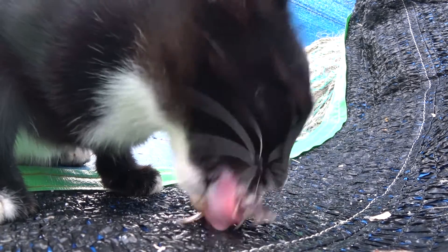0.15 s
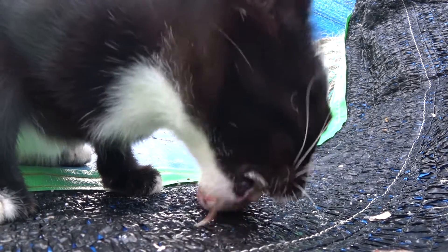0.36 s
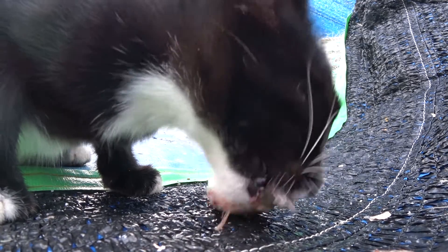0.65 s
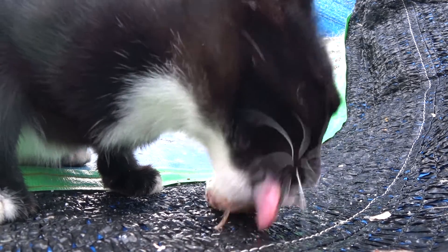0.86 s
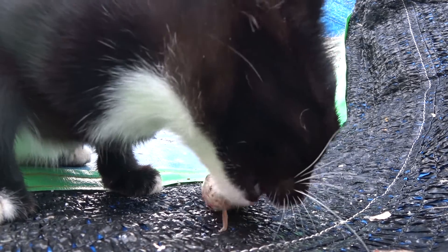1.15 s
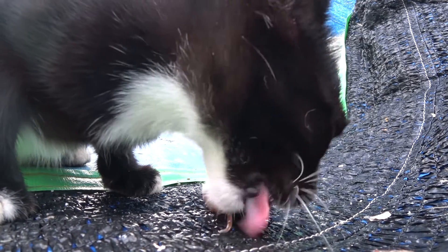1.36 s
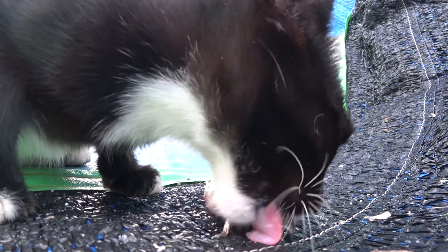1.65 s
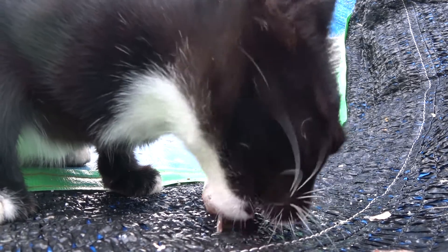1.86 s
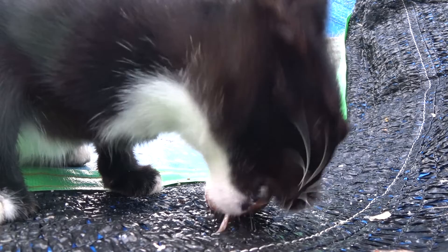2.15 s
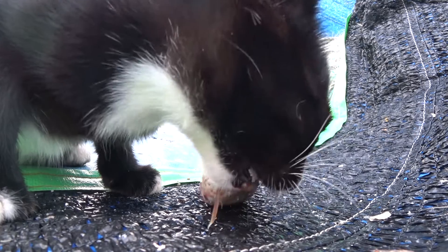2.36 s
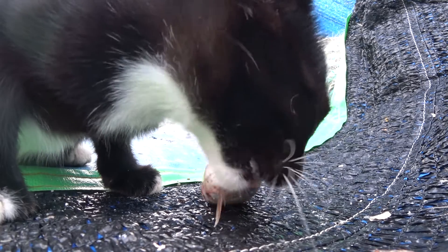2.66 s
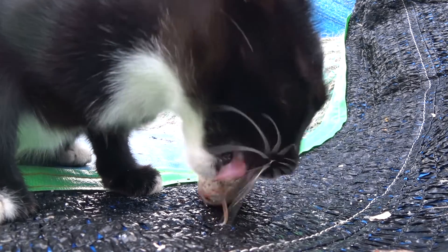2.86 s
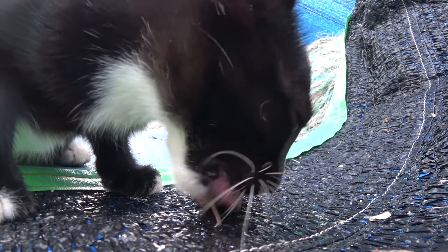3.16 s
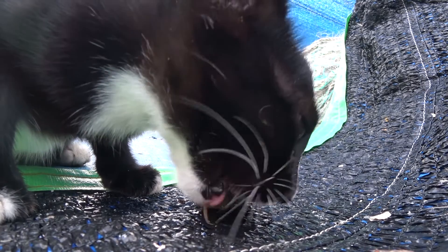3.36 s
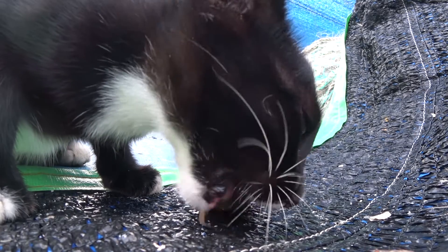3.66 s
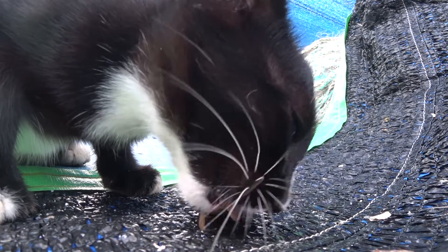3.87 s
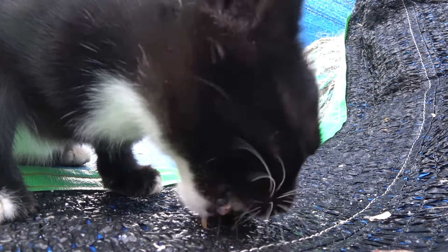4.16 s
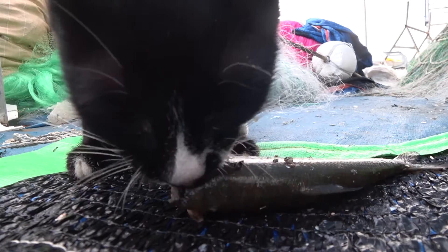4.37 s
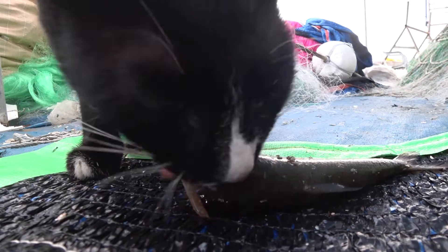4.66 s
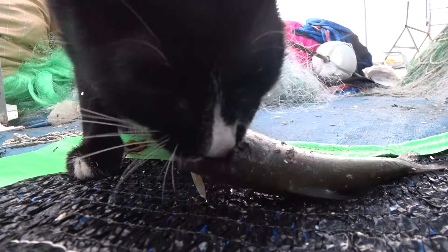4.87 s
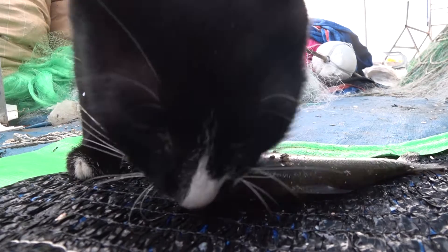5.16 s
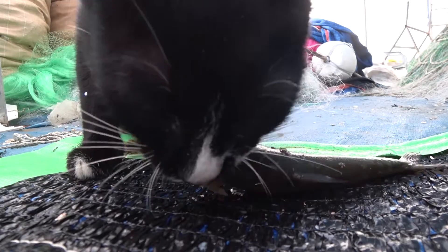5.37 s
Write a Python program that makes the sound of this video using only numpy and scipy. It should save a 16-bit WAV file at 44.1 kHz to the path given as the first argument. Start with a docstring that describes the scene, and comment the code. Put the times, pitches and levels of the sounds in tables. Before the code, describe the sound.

Close, wet animal eating: irregular lapping rasps, sticky crackles and hard little crunches of teeth on bone over a soft distant outdoor rush.

```python
"""Outdoors on a heap of netting, a kitten gnaws and licks a raw fish a hand's width from a camera's two ports.
Bites are sudden releases that ring mouth and bone; clucks and smacks are suction and wet films letting go.
The rasping tongue is noise and small slips through a gliding mouth resonance; saliva is crackle over fizz.
A soft distant rush of coloured noise lies behind; the limiter ducks everything after loud peaks."""
import sys
import numpy as np
from scipy import signal
from scipy.fft import rfft, irfft, next_fast_len
from scipy.io import wavfile
from scipy.ndimage import uniform_filter1d, minimum_filter1d, map_coordinates

SR = 44100
rng = np.random.default_rng(int(sys.argv[2]) if len(sys.argv) > 2 else 0)


def unload_audio(sound):
    """Save the sound as a 16-bit wav file, at the path given as the first command line argument."""
    columns = np.transpose(np.atleast_2d(sound))
    # keep every value between -1 and 1, then stretch to whole-number steps
    steps = np.round(np.clip(columns, -1, 1) * 32767)
    wavfile.write(sys.argv[1], SR, steps.astype(np.int16))


N = 242975

HIT = np.arange(2048) / SR  # time axis of one short sound, s
ONSET = 0.002  # its release comes this late in it, s
STEPS = np.arange(0, N, 64) / SR  # coarse time axis for the strokes, s

# strokes of the tongue over the fish, levels relative: t/s of the hardest pull, length/s, rasp level/dB,
# wetness level/dB, mouth f/Hz, glide of the mouth/(octaves per s), mouth Q
STROKES = [(0.414, 0.078, -39.5, -40.5, 1670, 0, 2.2), (.59, .035, -46, -57.5, 1640, 4, 3.8),
           (0.67, 0.051, -45, -50, 1410, -3.5, 1.6), (0.799, 0.084, -45, -49, 1890, -4, 1.9),
           (1.032, .05, -42, -61.5, 2330, 4.5, 3.4), (1.106, 0.09, -43, -43, 1390, -1, 0.47),
           (1.473, .045, -40, -56, 1290, 7.5, 2.2), (1.584, 0.059, -40, -46.5, 1915, -3, 1.8),
           (1.747, 0.033, -46.5, -68.5, 1740, -0.5, 1.56), (1.898, 0.071, -46.5, -52, 2010, -5.5, 2.7),
           (2.037, 0.038, -43, -60, 1650, -1.5, 1.2), (2.145, .06, -47, -58, 1730, 0, 1.5),
           (2.284, .08, -50.5, -51.5, 1880, -3, 2.6), (2.335, .04, -41.5, -51.5, 1370, -6.5, 2.1),
           (2.776, 0.036, -45, -66, 3330, 5.5, 1.2), (3.063, 0.16, -48.5, -53, 1667, -1.5, 2.6),
           (3.466, 0.083, -45.5, -50.5, 1820, 0, 4.2), (3.704, 0.073, -45, -54.5, 2400, -0.5, 1.05),
           (3.976, .075, -40.5, -53.5, 1894, -2.5, 1.8), (4.135, 0.023, -44, -55, 2232, -5.5, 1.7),
           (4.27, 0.019, -44, -53.5, 2000, 0.5, 1.3), (4.351, 0.084, -45.5, -52, 1574, 0, 1.7),
           (4.858, .075, -39, -53, 1780, 0.5, 0.74), (4.966, 0.074, -49, -50, 1797, -1.5, 1.5),
           (5.224, 0.031, -52.5, -53, 2273, 1, 1.07), (5.385, 0.047, -45.5, -46, 2000, -2.5, 0.32),
           (5.491, 0.03, -33, -47.5, 2000, 1, 0.64)]
WET_LEAD_S = 0.044  # the tongue lands wetly this long before it pulls hardest
# drop in dB at half a stroke's length before and after the peak; exponent of the fall (larger is rounder)
SWELL_DB, FADE_DB, ROUNDNESS = 6.5, 8, 1.27
REST_RASP_DB, REST_WET_DB = -66.5, -65.5  # the mouth between strokes, on the same scales as its strokes


def amp(db):
    """Decibels to gain."""
    return 10 ** (np.asarray(db) / 20)


def unit(x):
    """Scale to rms 1."""
    return x / np.sqrt(np.mean(x ** 2) + 1e-20)


def along(points, hz):
    """(Hz, value) points read on a log axis."""
    f, v = np.transpose(points)
    return np.interp(np.log(hz + 1), np.log(f), v)


def curves(rows):
    """One value per sample for each column after the time."""
    s, *cols = np.transpose(rows)
    return [np.interp(np.arange(N) / SR, s, c) for c in cols]


def wobble(rate):
    """A smooth random curve with rate knots a second."""
    knots = rng.standard_normal(int(N * rate / SR) + 4)
    return map_coordinates(knots, [np.arange(N) * rate / SR])


def filtered(x, response):
    """x times a response of frequency."""
    n = x.shape[-1]
    m = next_fast_len(n + 2048)  # room for the tail
    return irfft(rfft(x, m) * response(np.fft.rfftfreq(m, 1 / SR)), m)[..., :n]


def coloured(x, spectrum):
    """x through the causal minimum-phase filter that has this spectrum."""
    cepstrum = irfft(np.log(amp(along(spectrum, np.fft.rfftfreq(len(HIT), 1 / SR)))))
    fold = 1 + np.sign(len(HIT) / 2 - np.arange(len(HIT)))
    fold[0] = 1
    response = irfft(np.exp(rfft(cepstrum * fold)))
    return signal.fftconvolve(np.atleast_2d(x), response[None], axes=1)[:, :x.shape[-1]]


def resonance(f, hz, q):
    """Response of one damped mode."""
    return 1j * f * hz / q / (hz * hz - f * f + 1j * f * hz / q)


def highpass(f, hz):
    """A small source radiates little below hz."""
    return -f * f / (hz * hz - f * f + 1j * f * hz)


def noise(n, width):
    """Stereo noise: one shared part and one of each side's own."""
    shared = rng.standard_normal(n)
    return unit(shared + width * rng.standard_normal((2, n)))


def patchy(x, depth_db):
    """Patches of the spectrum swell and fade for a few hundredths of a second."""
    z = signal.stft(x, nperseg=256)[2]
    field = uniform_filter1d(rng.standard_normal(z.shape[1:]), size=9, axis=0)  # across frequency
    field = uniform_filter1d(field, size=7, axis=1)  # across time
    return unit(signal.istft(z * amp(depth_db * unit(field)), nperseg=256)[1][:, :N])


def crackle(rate, spread_db):
    """Tiny pops of unequal size at random moments, rate a second, each a little to one side."""
    at = np.flatnonzero(rng.random(N) < rate / SR)
    size = amp(spread_db * np.minimum(rng.standard_exponential(len(at)), 3.5))
    size = size * rng.choice([-1, 1], len(at))
    pops = np.zeros((2, N))
    pops[:, at] = size * amp(2 * rng.standard_normal((2, len(at))))
    return unit(pops)


def burst(rise, life, rough):
    """Strain crackles up over rise s, lets go at once and leaves chatter that dies over life s."""
    t = HIT - ONSET
    swell = np.exp(np.minimum(t / rise, -t / life))
    release = unit(np.arange(len(HIT)) == round(ONSET * SR))
    return release + rough * unit(noise(len(HIT), width=0.19) * swell)


def add(track, s, db, sound):
    """Put a short sound into the stereo track; db is its level as if packed into four milliseconds."""
    span = 0.004
    part = track[:, max(round((s - ONSET) * SR), 0):][:, :len(HIT)]
    levelled = amp(db) * unit(sound) * np.sqrt(span * SR / len(HIT))
    part += levelled[:, :part.shape[1]]


def outdoors():
    """A soft distant rush, narrow in the bass and wide in the middle."""
    # its level over time, with a quick drop late on: t/s, relative level/dB
    rush_level = [(0, -56.5), (.1, -51), (.25, -50), (1.5, -51), (2.4, -49.5), (3.2, -50.5), (4.3, -49.5),
                  (4.45, -52.5), (5.1, -50.5), (5.5, -52)]
    # colour of what both sides share: f/Hz, relative density/dB
    mid_colour = [(20, -13), (60, -9), (110, -6.5), (200, 0.5), (400, 0.5), (800, -0.5), (1100, -4),
                  (1500, -8.5), (2200, -8), (4500, -18.5), (6500, -60), (8500, -63), (12000, -29),
                  (16000, -15)]
    # colour of what sets the sides apart: f/Hz, relative density/dB
    side_colour = [(20, -21), (100, -17), (200, -11), (400, -3), (750, 1), (1100, -0.5), (1500, -2.5),
                   (2400, -7), (4500, -12.5), (6500, -18), (8000, -26), (16000, -22)]
    air_db, = curves(rush_level)
    mid = amp(air_db + 1.5 * wobble(11)) * unit(coloured(rng.standard_normal(N), mid_colour))
    side = amp(air_db - 1.1 + 0.3 * wobble(3.84)) * unit(coloured(rng.standard_normal(N), side_colour))
    return np.vstack([mid + side, mid - side])


def scuffing(wet_db):
    """Tugging at the fish scuffs it softly over the netting, harder when the chewing is wetter."""
    # colour of the scuff: f/Hz, relative density/dB
    scuff_colour = [(30, -22), (100, -5.5), (220, 6.5), (600, 1.5), (1500, 3.5), (4000, -49)]
    # dB at average wetness, and dB gained for each dB of wetness
    level_db = -58 + 0.61 * (wet_db - wet_db.mean())
    return amp(level_db) * unit(coloured(noise(N, width=0.39), scuff_colour))


def stroke(s, length, db):
    """Power of one stroke as it swells to its peak at s and fades."""
    u = 2 * (STEPS - s) / length
    drop_db = np.where(u < 0, SWELL_DB, FADE_DB) * abs(u) ** ROUNDNESS
    return amp(db - np.minimum(drop_db, 200)) ** 2


def wetness():
    """Relative dB of the wet flesh: it rises as the tongue lands and whenever the jaws squeeze."""
    # flesh squeezed between the jaws: t/s, length/s, relative level/dB
    squishes = [(0.147, .06, -53), (0.233, 0.062, -44.5), (0.888, 0.035, -48.5), (1.057, 0.032, -41.5),
                (1.206, 0.021, -48), (1.255, 0.012, -45.5), (1.31, 0.023, -46.5), (1.399, 0.035, -48),
                (1.753, 0.044, -49.5), (1.911, 0.034, -49.5), (2.146, .04, -50.5), (2.86, .023, -52),
                (3.012, 0.027, -52), (3.278, 0.065, -53), (3.606, 0.03, -50.5), (4.138, 0.019, -43.5),
                (4.753, 0.059, -50), (4.85, 0.052, -61), (5.08, 0.057, -48), (5.23, 0.032, -49),
                (5.4, .06, -49.5), (5.502, 0.017, -40.5)]
    landings = sum(stroke(s - WET_LEAD_S, length, db) for s, length, _, db, *_ in STROKES)
    squeezes = sum(stroke(s, length, db) for s, length, db in squishes)
    level_db = 10 * np.log10(amp(REST_WET_DB) ** 2 + landings + squeezes)
    return curves(np.column_stack([STEPS, level_db]))[0]


def saliva(wet_db):
    """Wet flesh crackles: ringing bubbles of many sizes, clustered ticks and sticky grains over a fine fizz."""
    # colour of the whole: f/Hz, gain/dB
    fizz_colour = [(300, -45), (1000, -22), (3000, -8.5), (5000, -3), (7000, 2.5), (8600, -7.5),
                   (11000, -4), (16000, -16.5)]
    bubbles = np.zeros((2, N))
    for hz in np.geomspace(3000, 13500, 11):
        pops = crackle(rate=35, spread_db=7.5)
        bubbles += unit(filtered(pops, lambda f: resonance(f, hz, q=11.0) * resonance(f, hz, q=2)))
    ticks = unit(crackle(rate=220, spread_db=4.5) * amp(5.9 * wobble(33)))
    fizz = patchy(noise(N, width=0.65), depth_db=1.6) * amp(2.4 * wobble(110))
    clumps = amp(5 * np.tanh(wobble(70)))
    grains = unit(crackle(rate=1100, spread_db=3) * clumps)
    mix = amp(1) * unit(bubbles) + ticks + grains + unit(fizz)
    return amp(wet_db + 7.5) * unit(coloured(mix, fizz_colour))


def spray(wet_db):
    """The finest films burst as crackle and noise in the top octave, louder when the flesh is wetter."""
    films = unit(crackle(rate=2000, spread_db=-2) + 0.7 * noise(N, width=0.8))
    films = films * amp(3 * np.tanh(wobble(80)))
    top = filtered(films, lambda f: resonance(f, 15000, q=1.4) * highpass(f, hz=8500))
    # dB at the wettest moment, and dB gained for each dB of wetness
    level_db = -46 + 0.96 * (wet_db - wet_db.max())
    return amp(level_db) * unit(top)


def licking():
    """Relative rasp dB, mouth resonance and its Q; the strongest stroke of the moment shapes the mouth most."""
    s, length, db, _, hz, glide, q = np.transpose(STROKES)[:, :, None]
    power = stroke(s, length, db)
    pitch = hz * 2 ** (glide * np.clip(STEPS - s, -length, length))
    share = power / power.sum(0)
    level_db = 10 * np.log10(amp(REST_RASP_DB) ** 2 + power.sum(0))
    return curves(np.column_stack([STEPS, level_db, (share * pitch).sum(0), (share * q).sum(0)]))


def rasp():
    """The tongue's barbs catch and slip; the mouth's resonance glides through each stroke."""
    level_db, mouth_hz, mouth_q = licking()
    barbs = noise(N, width=0.47) + 0.5 * crackle(rate=1200, spread_db=11.5)
    f, t, z = signal.stft(barbs, SR, nperseg=512, noverlap=384)
    now = np.minimum(t * SR, N - 1).astype(int)
    f, hz, q = f[:, None], mouth_hz[now], mouth_q[now]
    mouth = abs(resonance(f, hz, q)) ** 2 + 0.09 * abs(resonance(f, 1.2 * hz, q=1.3))
    mouth /= np.sqrt(np.mean(mouth ** 2, axis=0))  # moving the mouth leaves the level alone
    shaped = signal.istft(z * mouth, nperseg=512, noverlap=384)[1][:, :N]
    slips = amp(1.5 * wobble(90))
    return amp(level_db + 4.5) * slips * unit(shaped)


def faint_smacks(wet_db, count):
    """Small films burst at random, most often where the flesh is wettest: (s, relative dB, Hz)."""
    odds = np.cumsum(amp(0.5 * wet_db))
    moments = np.searchsorted(odds / odds[-1], rng.random(count)) / SR
    size, pitch = np.clip(rng.standard_normal((2, count)), -1.5, 1.5)
    return list(zip(moments, -41.5 + 2 * size, 8500 * 2 ** (0.35 * pitch)))


def smacks(wet_db):
    """A film of saliva bursts: a broad splash and the short ring of the pocket behind it."""
    # films bursting on lips and tongue, loud and faint: t/s, relative level/dB, pocket f/Hz
    timed_films = [(0.0533, -33, 10500), (0.0804, -33.5, 10100), (0.118, -36, 4900), (0.14, -23, 7540),
                   (0.1642, -42.5, 2610), (0.2161, -24, 6700), (0.2585, -41, 7160), (0.2981, -30.5, 11900),
                   (0.3016, -28.5, 6940), (0.3654, -36, 6720), (0.4978, -29.5, 6500), (0.536, -31.5, 10300),
                   (0.5412, -39.5, 10890), (0.571, -36, 6900), (0.7168, -32.5, 7000), (0.721, -26.5, 8530),
                   (1.033, -33.5, 11300), (1.055, -33, 6740), (1.064, -27, 9560), (1.0807, -31.5, 8950),
                   (1.111, -29.5, 6550), (1.131, -28, 4970), (1.139, -32.5, 6460), (1.164, -39, 6900),
                   (1.2483, -30, 2850), (1.2596, -33, 4350), (1.285, -37, 10500), (1.361, -35, 7300),
                   (1.5487, -30.5, 8500), (1.6622, -34, 2240), (1.7514, -31, 10480), (1.8973, -33.5, 10800),
                   (2.03, -34, 6320), (2.0354, -34, 4770), (2.117, -26.5, 6850), (2.403, -37.5, 2490),
                   (2.6459, -30, 3030), (2.6951, -39, 3340), (2.7917, -39.5, 5270), (2.825, -36.5, 10990),
                   (2.853, -36, 10200), (3.01, -34.5, 6260), (3.0553, -33, 5600), (3.3035, -30.5, 12500),
                   (3.4032, -37.5, 9700), (3.4265, -34, 9150), (3.6233, -22, 6370), (3.7867, -33, 6650),
                   (3.8476, -25.5, 8690), (3.9341, -32, 6600), (4.11, -35, 2440), (4.2263, -29, 4580),
                   (4.324, -29.5, 9920), (4.641, -39.5, 6450), (4.8768, -35, 7450), (5.0775, -34.5, 2910),
                   (5.0876, -40, 5610), (5.1166, -32.5, 12100), (5.284, -32.5, 5200), (5.31, -33.5, 4930),
                   (5.323, -34.5, 7250), (5.3411, -25, 7300), (5.363, -32, 4050), (5.3667, -30.5, 10000),
                   (5.391, -34.5, 3880), (5.4744, -33, 4300)]
    out = np.zeros((2, N))
    for s, db, hz in list(timed_films) + faint_smacks(wet_db, count=40):
        pop = burst(rise=0.00017, life=0.00076, rough=1.27)
        pocket = filtered(pop, lambda f: resonance(f, hz, q=3.3) * resonance(f, hz, q=4.7))
        edge_hz = 1.28 * hz  # the soft lips dull what lies far above the pocket's pitch
        lips = lambda f: 1 / (1 - (f / edge_hz) ** 2 + 1.3j * f / edge_hz)
        splash = filtered(pop, lambda f: resonance(f, 4.7 * hz, q=0.093) * lips(f))
        side_gain = amp(2.0 * rng.standard_normal((2, 1)))  # each a little to one side
        add(out, s, db, side_gain * (unit(pocket) + amp(1.5) * unit(splash)))
    return out


def knock(release, mouth_hz, q):
    """The mouth cavity's answer to a sudden release."""
    cavity = lambda f: resonance(f, mouth_hz, q) * resonance(f, mouth_hz, q=0.57)
    return filtered(release, lambda f: cavity(f) * highpass(f, hz=504) ** 2)


def crack():
    """The bright edge of a release."""
    # colour of the edge: f/Hz, relative gain/dB
    edge_colour = [(1500, -25), (4000, 10), (5800, 13), (7800, 7), (10000, -1), (16000, 5.5)]
    return coloured(burst(rise=0.0001, life=0.00077, rough=0.74), edge_colour)


def clucks():
    """Suction lets go as the tongue leaves the palate: a hollow pop of the mouth with a wet crack."""
    # pulls of the tongue: t/s, relative level/dB, mouth cavity f/Hz, relative crack level/dB
    pulls = [(0.112, -34, 1550, -51), (0.486, -30, 850, -35), (1.8111, -36, 1950, -40),
             (1.8568, -33.5, 2370, -40), (1.922, -40, 1636, -40.5), (1.9545, -35, 1434, -44),
             (2.1018, -41.5, 1640, -41), (2.841, -30, 1370, -38), (2.9433, -29, 1070, -69),
             (3.03, -33.5, 1690, -42), (3.2397, -39.5, 1710, -40), (3.5348, -37, 1050, -46.5),
             (3.8111, -40, 2270, -40.5), (5.0886, -40.5, 1076, -38)]
    out = np.zeros((2, N))
    for s, db, mouth_hz, crack_db in pulls:
        release = burst(rise=0.00079, life=0.0025, rough=0.49)
        add(out, s, db, knock(release, mouth_hz, q=3.2))  # the closed mouth rings longer than in most bites
        add(out, s, crack_db, crack())
    return out


def bites():
    """Teeth snap on bone: each bite thumps the mouth cavity, rings the bone and adds a bright crack."""
    # snaps, levels relative: t/s, knock level/dB, mouth cavity f/Hz, ring level/dB, bone f/Hz,
    # crack level/dB, cavity Q
    snaps = [(0.4714, -12, 870, -20.5, 4900, -17.5, 1.8), (1.176, -28, 1290, -30.5, 2890, -28, 0.62),
             (1.2378, -26.5, 1900, -25.5, 3400, -27.5, 1.4), (1.2418, -18, 1000, -32, 2920, -24, 1.9),
             (1.7506, -35, 1060, -47.5, 3330, -40, .52), (2.1122, -27.5, 1720, -28.5, 4860, -37, 3.8),
             (2.513, -16, 1255, -15, 3843, -26, 0.29), (2.639, -14.5, 876, -15, 4084, -24, 0.32),
             (3.6648, -32.5, 1230, -30.5, 2350, -38, 1.9), (3.95, -26.5, 1954, -34.5, 2420, -38, 1.3),
             (5.3406, -33.5, 880, -30, 4640, -34, 0.79), (5.4331, -19, 1310, -11.5, 3180, -12.5, 1.9)]
    out = np.zeros((2, N))
    for s, knock_db, mouth_hz, ring_db, bone_hz, crack_db, q in snaps:
        bone = lambda f: resonance(f, bone_hz, q=3.0) * resonance(f, bone_hz, q=0.84)
        add(out, s, knock_db, knock(burst(rise=0.0004, life=0.0019, rough=0.29), mouth_hz, q))
        add(out, s, ring_db, filtered(burst(rise=0.00008, life=0.0014, rough=0.92), bone))
        add(out, s, crack_db, crack())
    return out


def ports(x):
    """The mouth reaches the two ports unequally; paws and netting scatter a short answer."""
    # how far the left port leads for sounds at the fish: f/Hz, phase/rad
    lead = [(100, .1), (400, .7), (750, 1.15), (1500, 1.15), (3000, .6), (6500, .15), (16000, 0)]
    # how much louder the left port is: f/Hz, left-right level/dB
    tilt = [(300, -1.5), (1200, -1), (4500, -2.5), (8000, -0.7), (16000, 0.7)]
    half = lambda f: amp(along(tilt, f) / 2) * np.exp(0.5j * along(lead, f))
    direct = filtered(x, lambda f: np.array([half(f), 1 / half(f)]))
    t = np.arange(SR // 5) / SR
    # each falls 60 dB in the given seconds, after a gap
    near = rng.standard_normal((2, len(t))) * amp(-60 * t / 0.025) * (t > 0.0012)
    far = rng.standard_normal((2, len(t))) * amp(-60 * t / 0.019) * (t > 0.005)
    answer = (amp(-15) * unit(near) + amp(-27) * unit(far)) / np.sqrt(len(t))
    return direct + signal.fftconvolve(x, answer, axes=1)[:, :N]


def scene():
    """The chewing mouth in front of the outdoor rush."""
    wet_db = wetness()
    snaps = amp(2) * bites() + amp(5.0) * clucks() + amp(1.12) * smacks(wet_db)
    close = snaps + rasp() + saliva(wet_db) + spray(wet_db) + scuffing(wet_db)
    return ports(close) + outdoors()


def limiter(x, ceiling_db, recovery):
    """Peaks over the ceiling pull the gain down within a millisecond; it climbs back at recovery dB a second."""
    over = np.maximum(20 * np.log10(abs(x).max(0) + 1e-9) - ceiling_db, 0)
    climb = recovery * np.arange(N) / SR
    cut = np.maximum.accumulate(over + climb) - climb
    gain_db = uniform_filter1d(minimum_filter1d(-cut, size=45), size=45)
    return x * amp(gain_db)


def record(dry):
    """The camera limits the peaks, softens the top octave and cuts steeply at its band limit."""
    limited = limiter(dry, ceiling_db=-1.0, recovery=31)
    soft = filtered(limited, lambda f: 1 / np.sqrt(1 + (f / 15000) ** 6))
    return filtered(soft, lambda f: 1 / (1 + (f / 16000) ** 120))


dry = scene()
out = record(dry)
unload_audio(out)
```